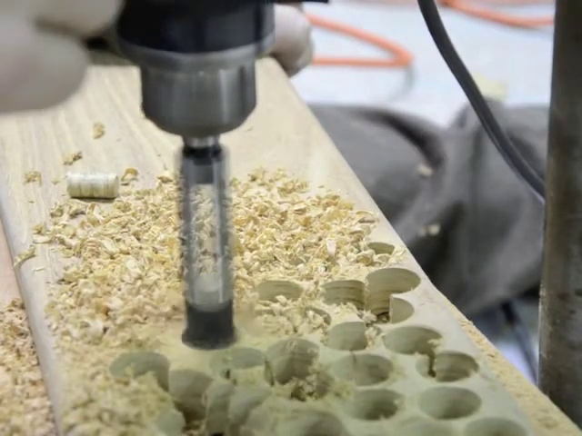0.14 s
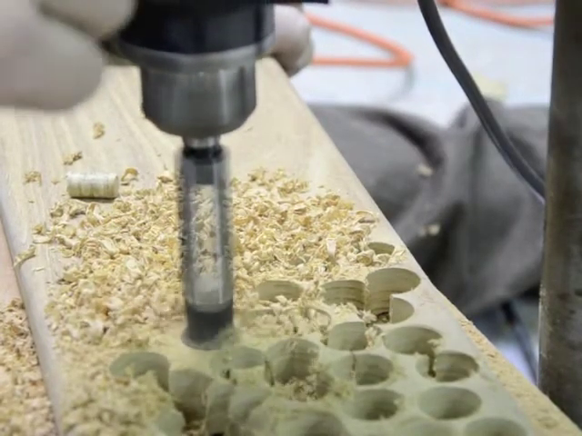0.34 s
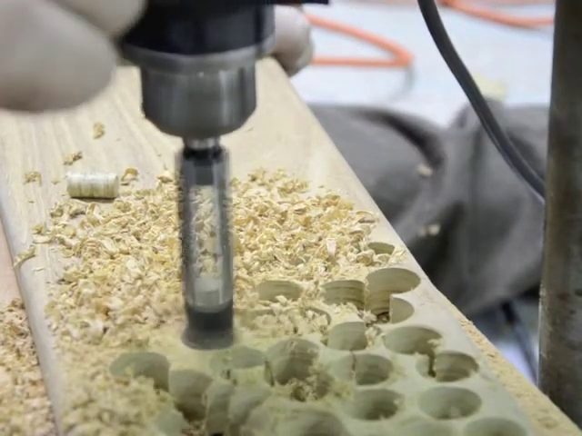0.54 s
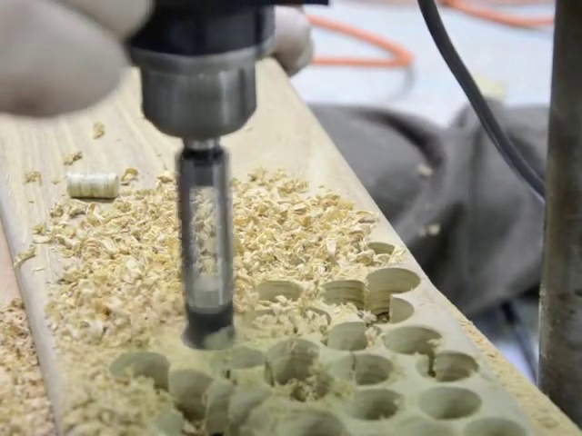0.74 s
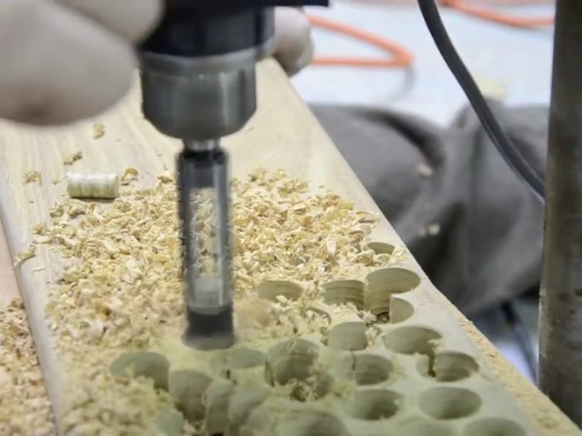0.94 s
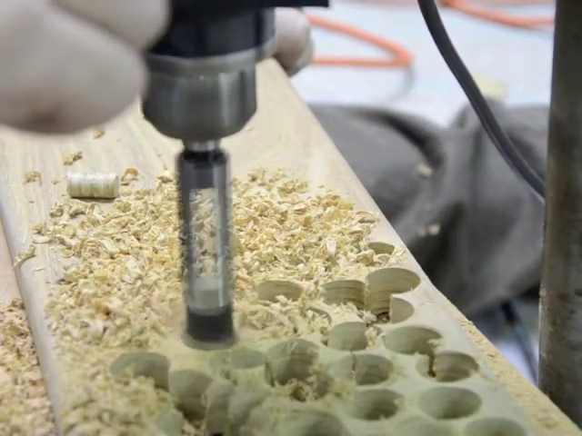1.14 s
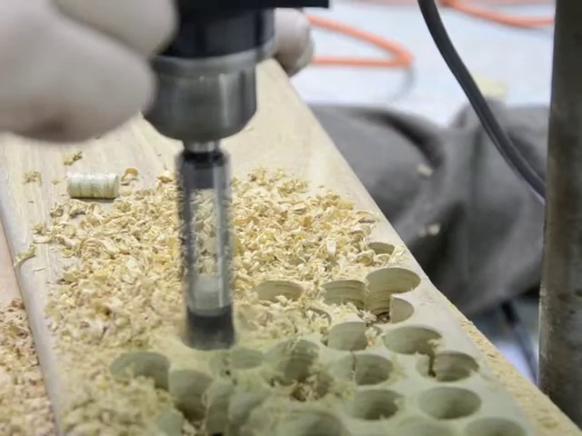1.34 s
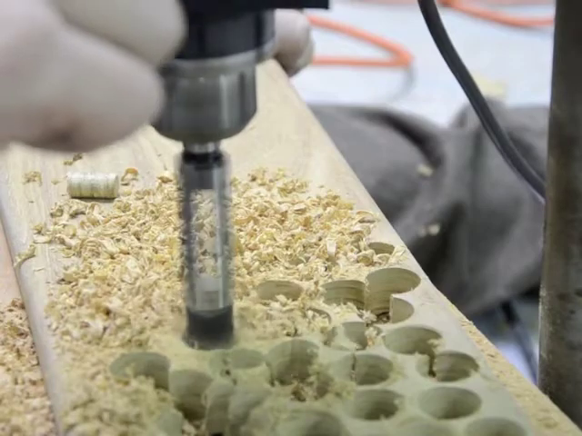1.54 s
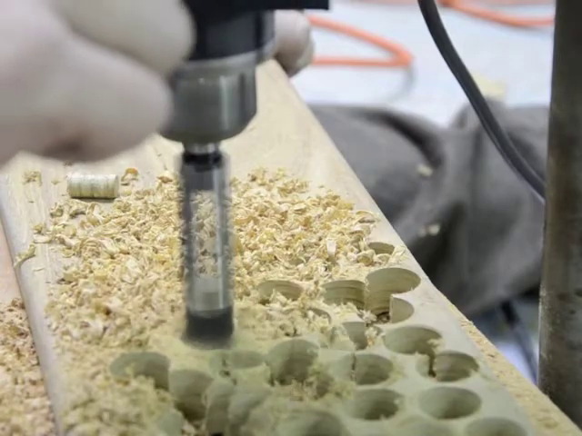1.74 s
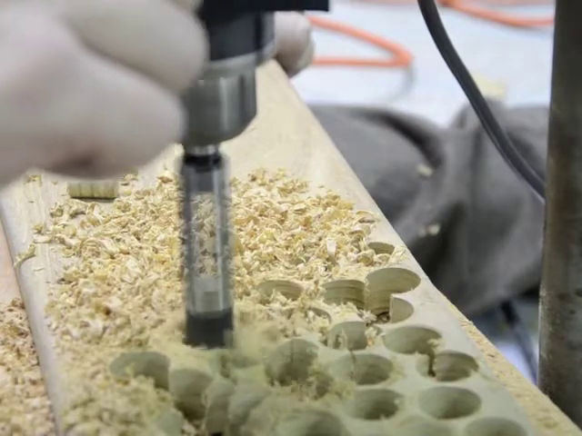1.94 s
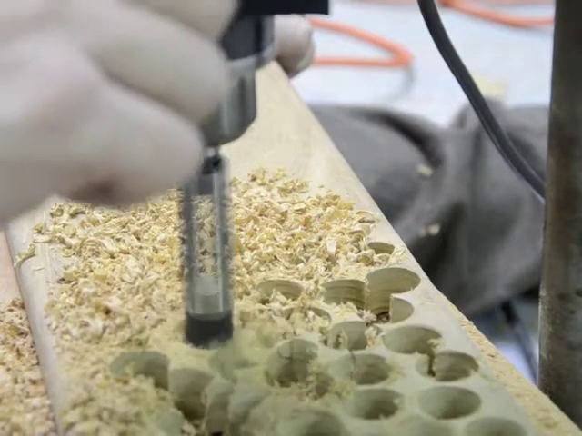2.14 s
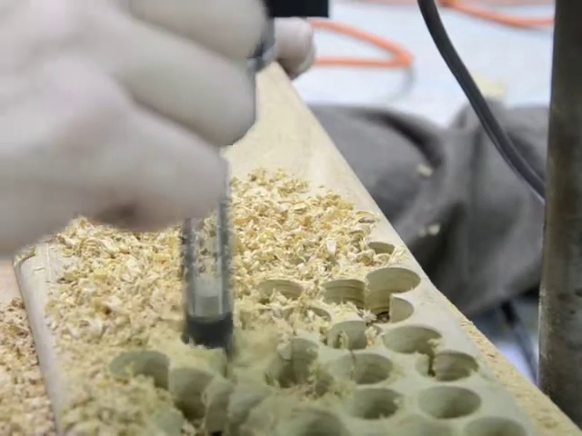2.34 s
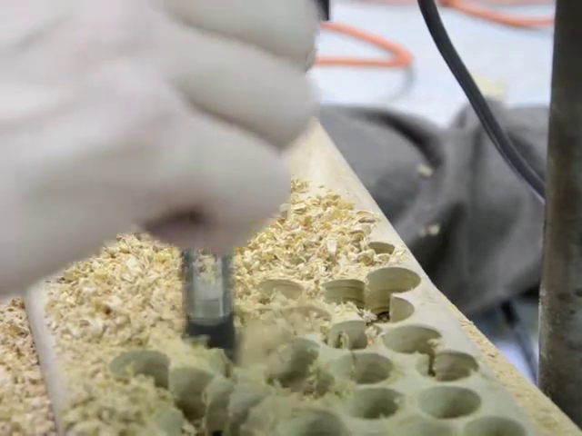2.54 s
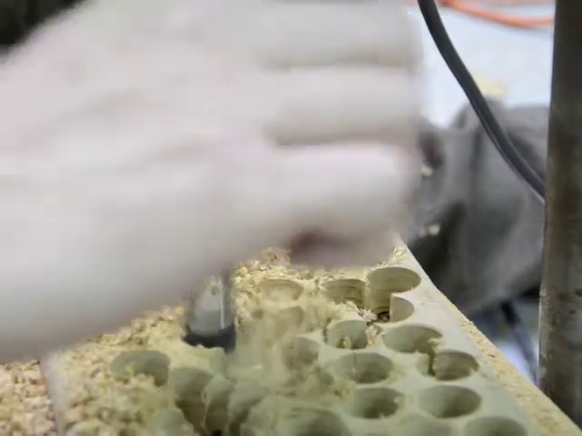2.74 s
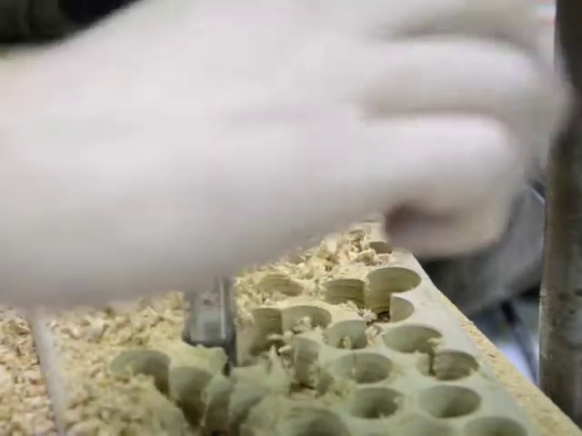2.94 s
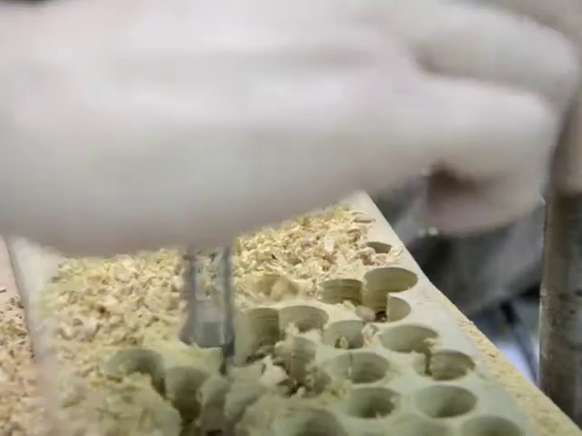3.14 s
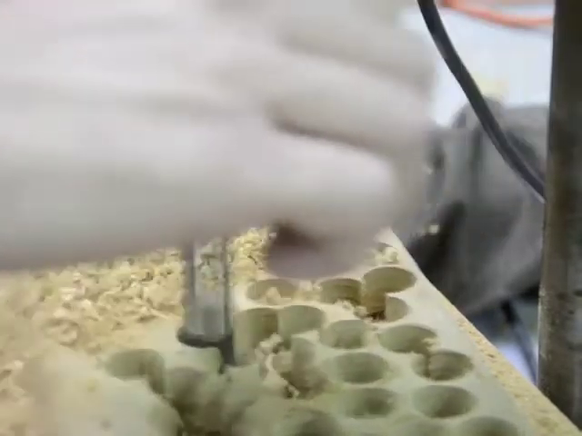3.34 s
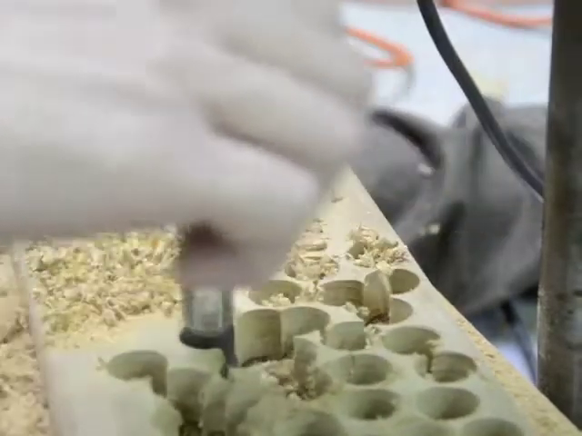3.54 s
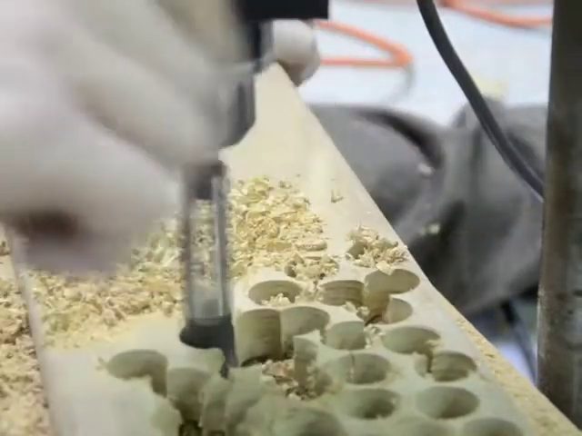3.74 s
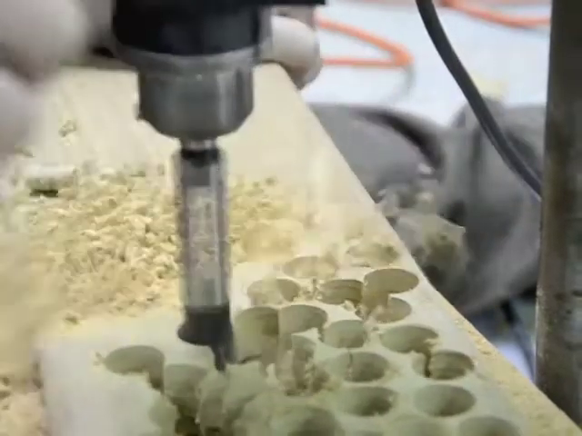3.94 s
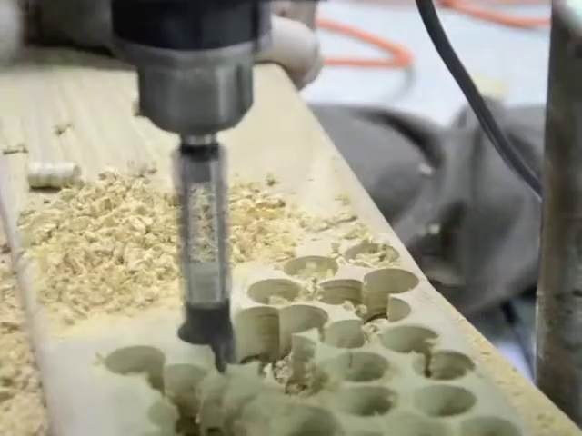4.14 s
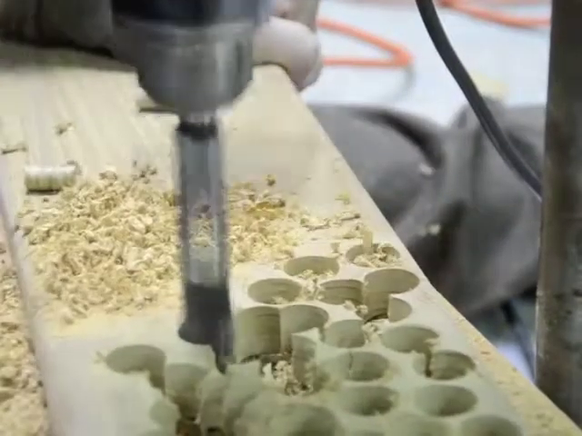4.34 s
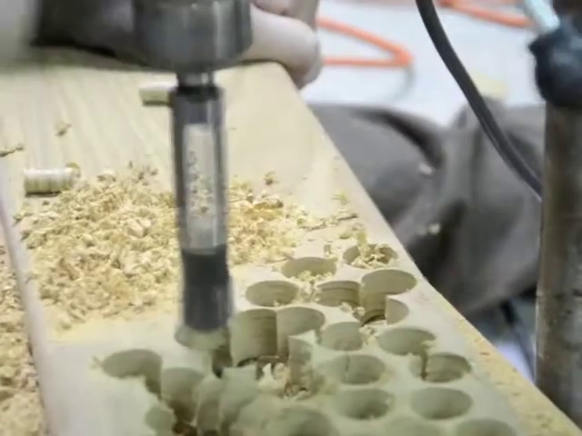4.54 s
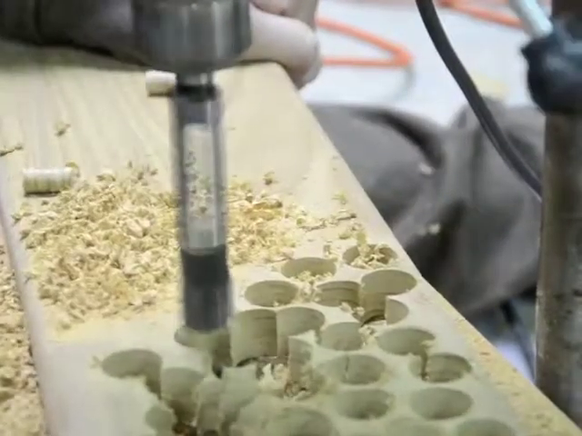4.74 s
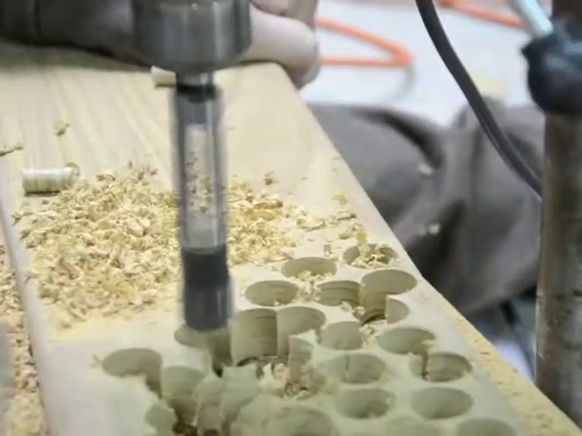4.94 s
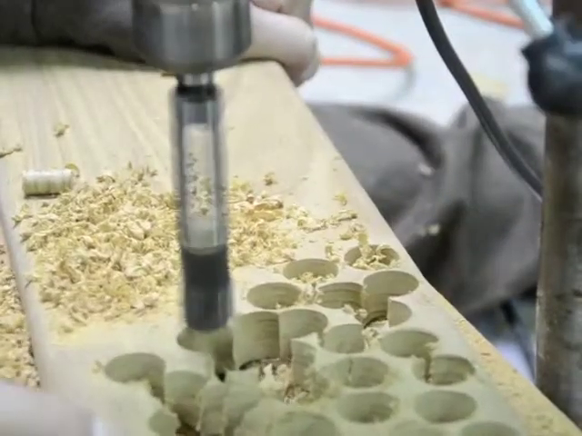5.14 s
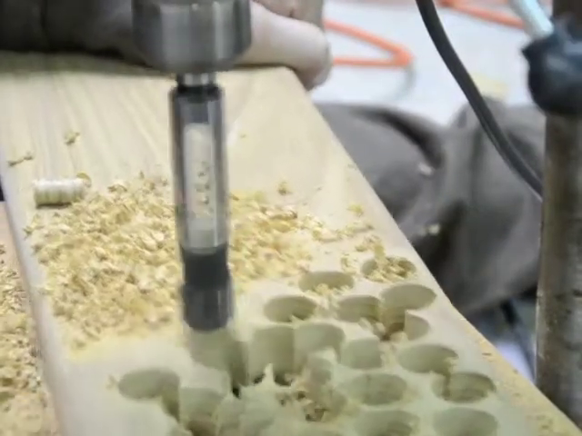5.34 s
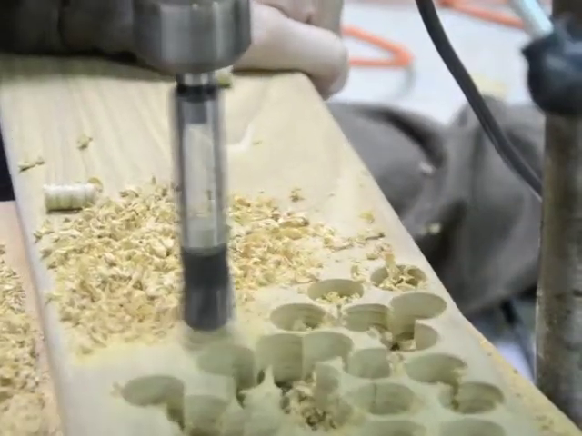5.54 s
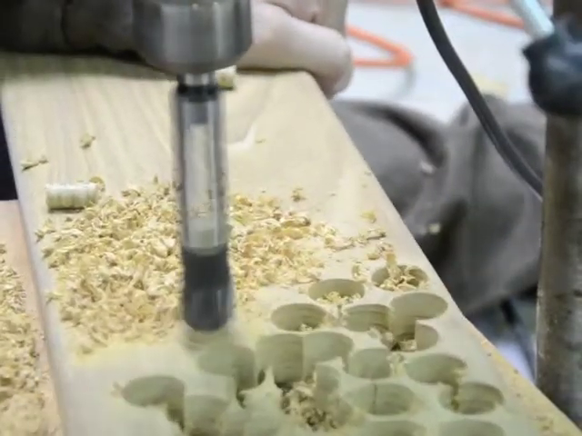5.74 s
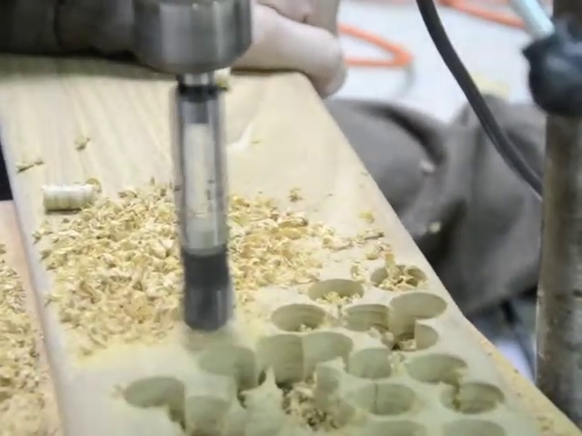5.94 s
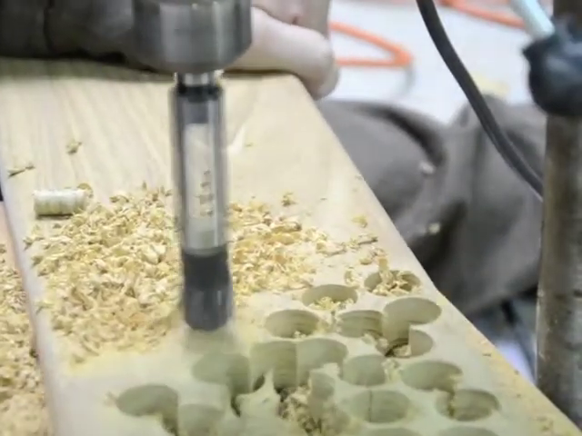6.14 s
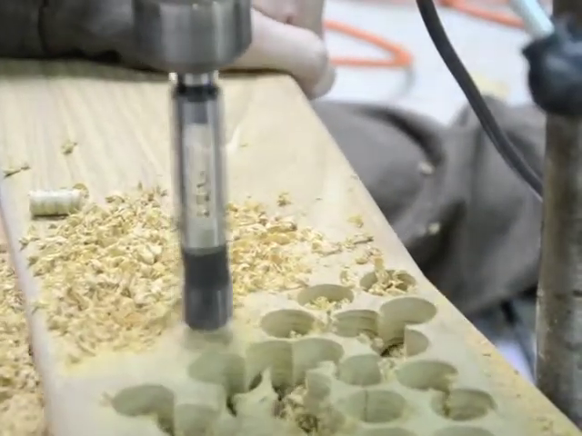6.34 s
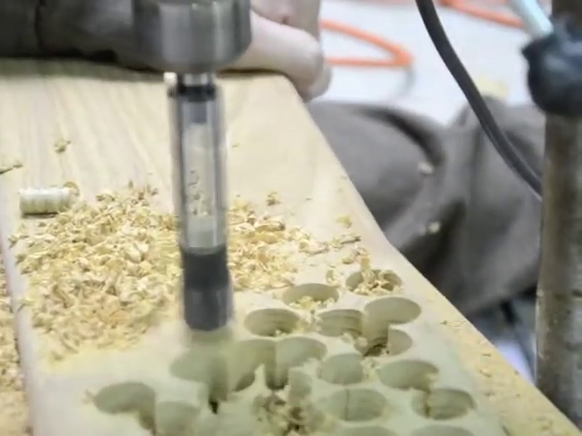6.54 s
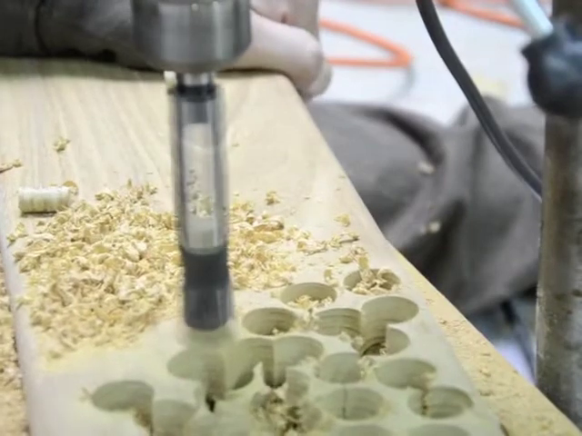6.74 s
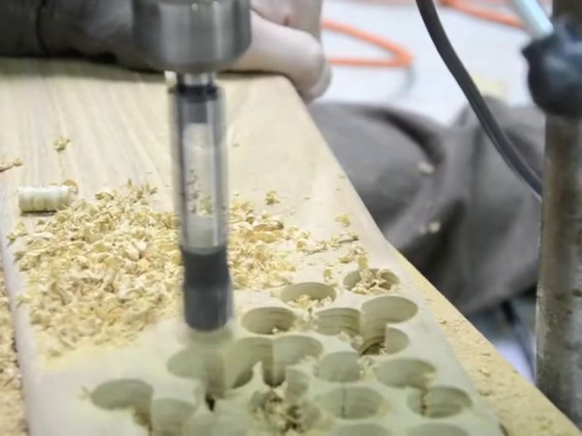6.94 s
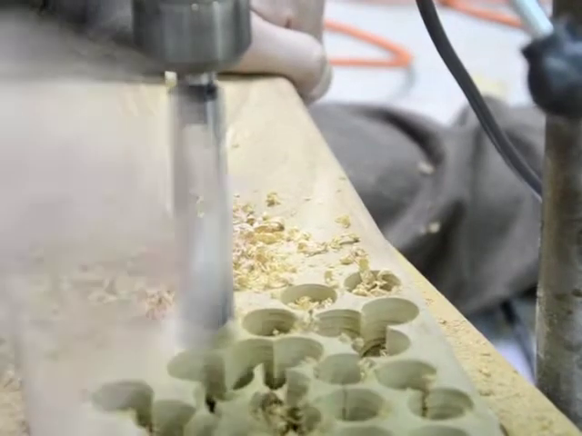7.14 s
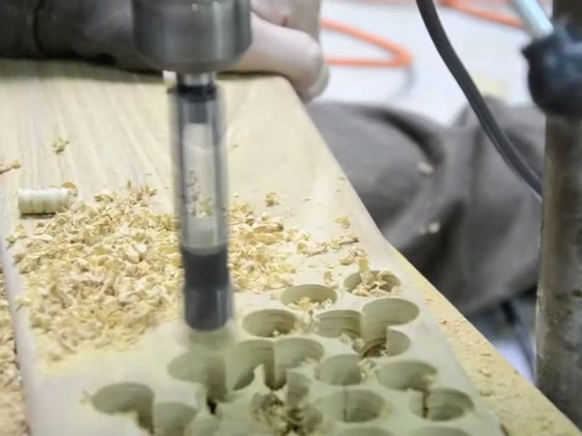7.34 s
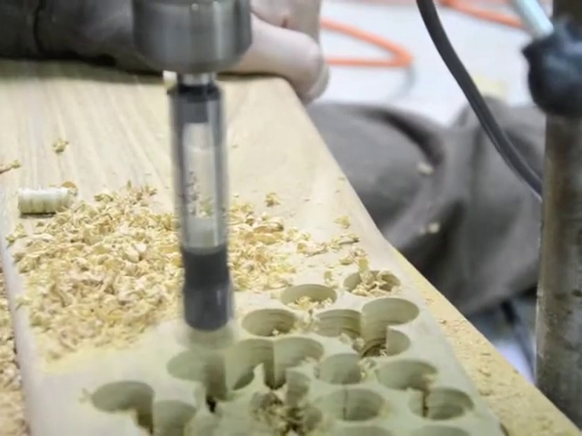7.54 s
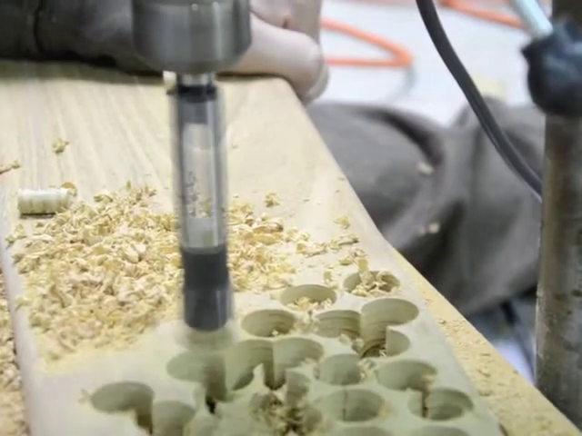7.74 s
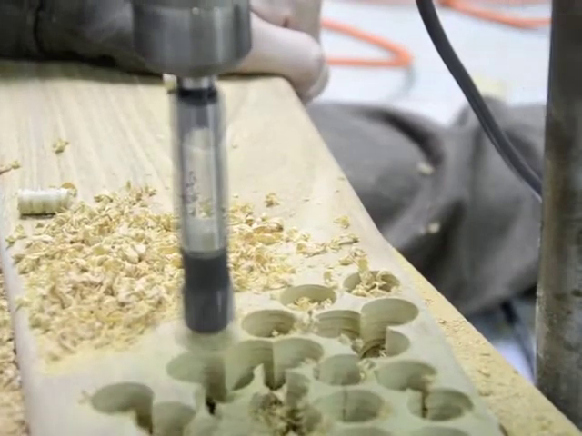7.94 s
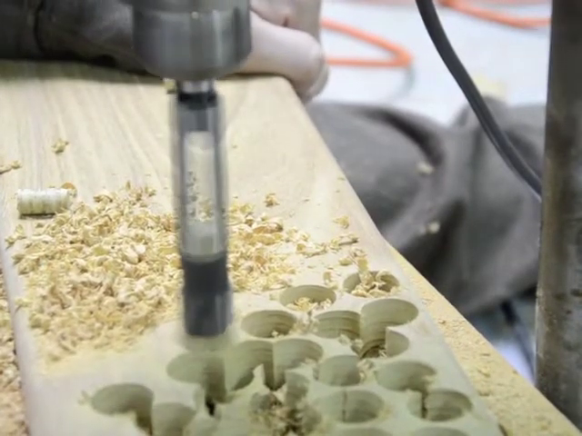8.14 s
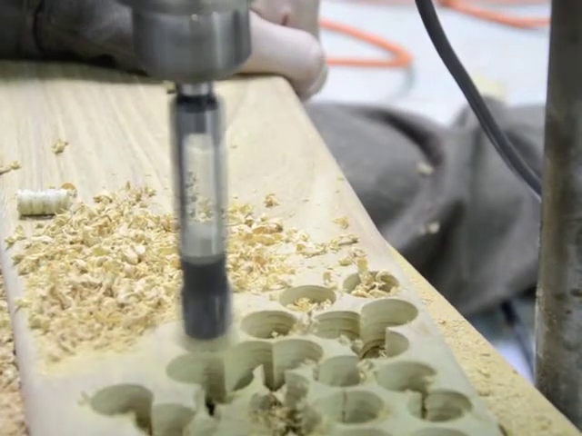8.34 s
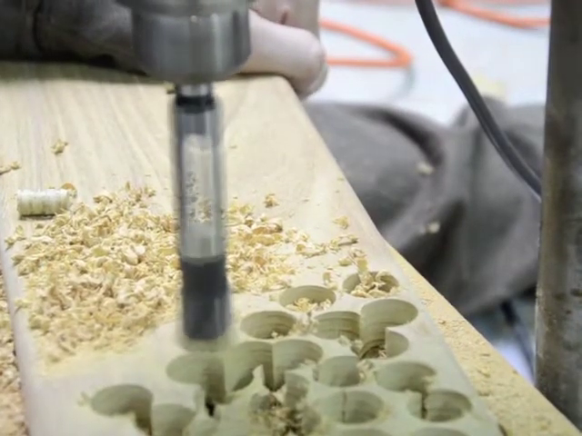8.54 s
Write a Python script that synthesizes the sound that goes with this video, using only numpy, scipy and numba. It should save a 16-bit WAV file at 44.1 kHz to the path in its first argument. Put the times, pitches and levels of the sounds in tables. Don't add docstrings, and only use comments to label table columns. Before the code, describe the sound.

Steady woody grinding over a motor hum, bursts of cracking and loud wooden chatter, then a free-spinning spindle clicking quickly in the reverberant workshop.

```python
import sys
import numpy as np
from scipy import signal
from scipy.fft import rfft, irfft
from scipy.io import wavfile
from scipy.ndimage import uniform_filter1d
from numba import njit

SR = 44100
rng = np.random.default_rng(int(sys.argv[2]) if len(sys.argv) > 2 else 0)


def log_audio(samples):
    frames = np.atleast_2d(samples).T
    limited = np.clip(frames, -1, 1)
    pcm = np.round(limited * 32767).astype(np.int16)
    wavfile.write(sys.argv[1], SR, pcm)


def attenuation_scalar(level_db):
    decades = np.asarray(level_db, float) / 20
    return 10 ** decades


N = 382788
T = np.arange(N) / SR
SPINDLE_LOADED_HZ, SPINDLE_FREE_HZ = 10.03, 10.64


def curves(table):
    s, *columns = np.transpose(table)
    return [np.interp(T, s, c) for c in columns]


def unit(x):
    return x / np.sqrt(np.mean(x ** 2))


def colour(x, points):
    hz, db = np.transpose(points)
    f = np.maximum(np.fft.rfftfreq(4096, 1 / SR), 1)
    gain = attenuation_scalar(np.interp(np.log(f), np.log(hz), db))
    cepstrum = irfft(np.log(gain))
    cepstrum[1:2048] *= 2
    cepstrum[2049:] = 0
    return signal.oaconvolve(x, irfft(np.exp(rfft(cepstrum))))[:N]


def ring(x, modes):
    out = 0
    for k, (hz, width, db) in enumerate(modes):
        b, a = signal.iirpeak(hz, hz / width, SR)
        out = out + (-1) ** k * attenuation_scalar(db) * signal.lfilter(b, a, x)
    return out


def band(x, lo_hz, hi_hz):
    sos = signal.butter(3, [lo_hz, hi_hz], "band", fs=SR, output="sos")
    return signal.sosfilt(sos, x)


@njit
def sweep(x, hz, width):
    y, b, l = np.empty(len(x)), 0., 0.
    for i in range(len(x)):
        g, k = np.tan(np.pi * hz[i] / SR), width / hz[i]
        v = (b + g * (x[i] - l)) / (1 + g * (g + k))
        b, l, y[i] = 2 * v - b, l + 2 * g * v, k * v
    return y


def walk(rate):
    k = int(SR / rate)
    steps = np.repeat(rng.standard_normal(N // k + 1), k)
    slewed = uniform_filter1d(uniform_filter1d(steps, k), k)
    return unit(slewed[:N])


def grit(spread_db):
    size_db = spread_db * np.minimum(rng.exponential(size=N), 6)
    return unit(rng.standard_normal(N) * attenuation_scalar(size_db))


def teeth(turns, once, twice, four):
    angle = 2 * np.pi * turns
    return attenuation_scalar(once * np.cos(angle) + twice * np.cos(2 * angle) + four * np.cos(4 * angle))


def layered(x):
    boom = band(band(x, 65, 412), 56, 610)
    return unit(band(x, 775, 2340)), unit(boom), unit(band(x, 3720, 20000))


def blows(times, db, decay_s, spray_db):
    kicks, spray = np.zeros(N), np.zeros(N)
    for s, gain, decay in np.broadcast(times, attenuation_scalar(db), np.maximum(decay_s, .001)):
        i = int(s * SR)
        kicks[i] += gain
        spray[i:i + 4000] += gain * np.exp(-T[:min(4000, N - i)] / decay)
    return kicks + attenuation_scalar(spray_db) * grit(1.0) * spray


def pings(table, gain_db, t60_s, rise_s):
    out, age = np.zeros(N + SR), T[:SR // 5]
    shape = (1 - np.exp(-age / rise_s)) * np.exp(-np.log(1000) * age / t60_s)
    for (s, db, hz), (pair, phase) in zip(table, rng.random((len(table), 2))):
        angle = 2 * np.pi * hz * age
        partner = np.sin(angle * (1.04 + 0.105 * pair) + 2 * np.pi * phase)
        out[int(s * SR):][:len(age)] += attenuation_scalar(db + gain_db) * shape * (np.sin(angle) + 0.49 * partner)
    return out[:N] * attenuation_scalar(3.0 * walk(400))


# start_s, feed level_db, cutter_depth in the hole [0-1]
BORING = [
    (0, -34, 0.23),
    (.95, -31, 0.18),
    (1.4, -31, 0.12),
    (1.75, -29.5, 0.69),
    (1.97, -33, 0.98),
    (2.1, -36.5, 0.65),
    (2.25, -40.5, 0.85),
    (2.5, -30.5, 0.72),
]
# freq_hz, level_db [per Hz]
SHEAR_COLOUR = [(360, -43.5), (650, -11.5), (750, -11), (1040, -2), (1180, -6.5), (1360, -1.5),
                (2050, -7.5), (2400, -10), (3100, -11), (4300, -21), (8300, -29.5), (8800, -35),
                (11500, -37), (16000, -44)]
# freq_hz, width_hz, level_db
CUTTER_MODES = [(2054, 74, 10.5), (5240, 160, 1), (6080, 190, -4), (7040, 140, -4), (8000, 230, -5),
                (9430, 640, -8), (11400, 650, -9), (13300, 400, -14)]


def bore(turns):
    level_db, depth = curves(BORING)
    shallow_hz, deep_hz = (1050, 1560, 1870), (715, 1340, 1740)
    sags = (depth ** 2, depth, depth)
    low_hz, high_hz, top_hz = (a + (b - a) * sag for a, b, sag in zip(shallow_hz, deep_hz, sags))
    shear = grit(1.1) * teeth(turns, 0.085, 1.6, 0.98) * attenuation_scalar(0.83 * walk(60.54))
    rub = grit(2.3) * teeth(turns, 1.8, 2.7, 2.0)
    wood = unit(colour(shear, SHEAR_COLOUR)) + attenuation_scalar(-15.5) * unit(ring(rub, CUTTER_MODES))
    low = attenuation_scalar(5.0 + 4.3 * depth) * sweep(shear, low_hz, 60.0)
    high = attenuation_scalar(9.5) * sweep(shear, high_hz, 45.0)
    top = attenuation_scalar(-3.5) * sweep(shear, top_hz, 73.0)
    hole = unit(low - high + top)
    middle, boom, bright = layered(wood)
    bright_db = -18.5 - 1 * (level_db + 31.5)
    hole_db = -6 + 7 * depth
    cut = middle + attenuation_scalar(-14.5) * boom + attenuation_scalar(bright_db) * bright + attenuation_scalar(hole_db) * hole
    fade = np.clip((BORING[-1][0] + 0.22 - T) / 0.61, 0, 1)
    return attenuation_scalar(level_db) * fade * cut


# start_s, length_s, first_db, last_db, table_weight_db
SNATCHES = [(2.518, 0.092, -21, -28.5, -2.5), (2.645, 0.04, -24, -15.5, 1), (2.745, 0.023, -26, -23.5, 0.5),
            (2.83, 0.017, -19, -22, -2), (2.902, 0.064, -24, -23.5, 1), (3.024, 0.02, -7.5, -14.5, -5),
            (3.094, 0.075, -8, -11, -2.5), (3.188, 0.0065, -12, -11, -7.5), (3.232, 0.033, -13, -12.5, -1),
            (3.281, 0.15, -10, -13.5, -3), (3.395, 0.015, -16.5, -17.5, 7.5), (3.775, 0.021, -23, -20, -5),
            (3.795, 0.061, -11.5, -20, 0.5), (3.866, 0.037, -11, -18, -2), (3.902, 0.045, -11, -9.5, -0.5),
            (3.976, 0.13, -14.5, -13, -1.5), (4.132, 0.03, -13, -11.5, -2.5), (4.18, 0.015, -9, -24, -7),
            (4.273, 0.093, -15, -11, 0), (4.377, 0.076, -17.5, -10, -6), (4.495, 0.15, -16.5, -44, -6)]


def bites(release_db_per_s, weight_share):
    attack_s = 0.0051
    gain, age = np.zeros(N), T[:SR // 2]
    for s, length, first_db, last_db, weight_db in SNATCHES:
        held_db = np.interp(age, [0, length], [first_db, last_db])
        db = held_db - release_db_per_s * np.maximum(age - length, 0)
        span = gain[int(s * SR):][:len(age)]
        bite = attenuation_scalar(db + weight_share * weight_db) * np.minimum(age / attack_s, 1)
        np.maximum(span, bite, out=span)
    return gain


# freq_hz, level_db [per Hz]
TEAR_COLOUR = [(24, -53), (40, -39.5), (320, -21.5), (402, 0), (503, 0), (556, 5.5), (852, -3),
               (1370, -7.5), (2260, -14), (2980, -10), (4340, -25), (11600, -37.5), (16000, -50)]
# freq_hz, width_hz, level_db
BOARD_MODES = [(402, 38, -4.5), (458.2, 30.5, 6.5), (813, 120, 1.5), (1054, 155, 4), (1330, 190, 3.5),
               (1616, 240, 0.5), (2000, 235, -1), (3000, 770, -15), (8100, 150, -23.5), (11800, 810, -27)]


def snatch():
    tear = grit(3.34) * attenuation_scalar(2.53 * walk(120))
    wood = unit(colour(tear, TEAR_COLOUR)) + attenuation_scalar(-14.0) * unit(ring(tear, BOARD_MODES))
    shares_db, releases_db_per_s, weight_shares = (-8.0, -9.5, -22.5), (457, 214, 587), (0, 0.63, -1)
    out = np.zeros(N)
    for db, release, weight, part in zip(shares_db, releases_db_per_s, weight_shares, layered(wood)):
        out += attenuation_scalar(db + 0.28 * walk(97)) * bites(release, weight) * part
    return out


# start_s, crack_peak_db, wooden_body_db and fine_splinters_db [against crack]
SPLINTER_BLOWS = [(1.316, -46, 0, 3), (1.84, -28, 10, -17), (1.881, -17.5, 5.5, -15), (1.951, -28, 13, -30),
                  (2, -36, 3, -11), (2.04, -29, 4, -2), (2.056, -20, -3, -12), (2.0981, -16, 8.5, -1.5),
                  (2.1511, -29, -4, -11), (2.221, -46, 0, -1), (2.243, -48, -2, 4), (2.287, -42, 0, -2),
                  (2.299, -36, -2, -3), (2.342, -48, -3, -2), (2.383, -32, 11, -9), (2.431, -25, 2, -12),
                  (2.442, -37, 4, -2), (2.456, -31, -3, -6), (2.5043, -23, 0, -14), (2.522, -19, -4, -9),
                  (2.5364, -17, 0, -25), (2.5432, -23, 11, -10), (2.598, -32, 6, -22), (2.65, -30, 7, -11),
                  (2.658, -21, 13, -27), (2.67, -25, 17, -20), (2.699, -26, 3, -13), (2.724, -32, 0, -3),
                  (2.74, -18.5, 5, -7), (2.8133, -26, -1, -10), (2.839, -17.5, -3, -8),
                  (2.909, -22.5, 3, -11), (2.9308, -17, 3.5, -9), (2.955, -25, 9, -10),
                  (3.525, -32, 6, -33), (3.558, -35, 7, -27), (3.6728, -30.5, 2.5, -18),
                  (3.698, -32, 5, -6), (3.754, -32, -1, -24)]
# start_s, crack_peak_db, wooden_body_db [against crack]
HAMMER_BLOWS = [(3.0266, -9.5, 7), (3.098, -19.5, 15.5), (3.108, -7.5, 2.5), (3.131, -10, 0),
                (3.1556, -7.5, 6.5), (3.196, -13.5, 11.5), (3.2404, -15, 15), (3.291, -26, 19),
                (3.315, -19, 12), (3.344, -13.5, 11.5), (3.404, -9.5, 2.5), (3.777, -24, 7),
                (3.805, -15, 7.5), (3.825, -13.5, -2), (3.8507, -19, 12), (3.872, -3.5, 1),
                (3.897, -18, 15), (3.969, -9.5, 6.5), (4.04, -12.5, 10), (4.0669, -7.5, 1.5),
                (4.1343, -15, 13), (4.158, -11, 4), (4.183, -13, 7), (4.279, -35, 13), (4.308, -22, 10),
                (4.327, -16, 9), (4.351, -13, 9.5), (4.4405, -14, 6.5), (4.4643, -14, 12), (4.485, -9, -9)]
# freq_hz, width_hz, level_db
CRACK_MODES = [(2510, 530, -2), (3205, 70, -1), (3480, 310, -5), (4850, 910, -17.5)]
# freq_hz, width_hz, level_db
PLUG_MODES = [(3110, 70, 3), (3430, 110, -4)]
# start_s, peak_db
CHIP_KNOCKS = [
    (8.423, -17.5),
    (8.516, -26.5),
    (8.613, -32),
]
# start_s, peak_db, pitch_hz
WEB_CHATTER = [(2.677, -6.5, 1250), (2.745, -15, 896), (2.769, -17, 1045), (2.91, -11, 1000),
               (3.028, -4, 1027), (3.122, -2, 1410), (3.146, -2, 1003), (3.163, -9, 1366),
               (3.194, -7, 1280), (3.197, -5, 1580), (3.245, -5.5, 1340), (3.263, -12, 910),
               (3.293, -10, 1000), (3.329, -7, 1390), (3.348, -9, 1386), (3.364, -14, 1560),
               (3.415, -13.5, 900), (3.444, -19, 1380), (3.803, -9, 880), (3.827, -13, 844),
               (3.852, -8, 786), (3.872, -5, 1225), (3.911, -1.5, 853), (3.922, -0.5, 1340),
               (3.93, -8, 991), (3.945, -7.5, 840), (3.984, -8.5, 905), (4.022, -12, 838),
               (4.044, -11, 1214), (4.066, -5, 1384), (4.079, -9, 853), (4.117, -14, 925),
               (4.136, -11, 1020), (4.161, -7.5, 1410), (4.184, -12, 1033), (4.308, -5.5, 857),
               (4.331, -11, 1020), (4.345, -4, 1490), (4.354, -5.5, 1054), (4.369, -9, 1320),
               (4.42, -5, 970), (4.425, -9.5, 806), (4.448, -9, 1525), (4.466, -6, 1787),
               (4.487, -15, 1010), (4.547, -18.5, 1490)]
# start_s, peak_db, pitch_hz
TABLE_THUDS = [(3.043, -19.5, 440), (3.173, -21, 408), (3.305, -11, 456), (3.343, -12.5, 465),
               (3.411, -6.5, 440), (3.439, -23, 441), (3.879, -13, 398), (3.931, -16, 388),
               (3.979, -11.5, 402), (4.16, -13.5, 449), (4.286, -19, 418), (4.313, -17, 472),
               (4.338, -24, 401), (4.366, -12, 410), (4.394, -16, 437), (4.424, -14, 477),
               (4.444, -18, 476), (4.472, -11.5, 460), (8.431, -17, 464)]


def strikes():
    s, crack_db, body_db = np.transpose([row[:3] for row in SPLINTER_BLOWS] + HAMMER_BLOWS)
    fine_db = np.array([row[-1] for row in SPLINTER_BLOWS] + [-13] * len(HAMMER_BLOWS))
    decay_s = np.repeat([0.004, 0.0088], [len(SPLINTER_BLOWS), len(HAMMER_BLOWS)])
    crack = ring(blows(s, crack_db, decay_s, -15.5), CRACK_MODES)
    fine_colour = [(3500, -21), (5500, 5), (8000, 3.5), (11500, -1.5), (14500, -10), (16000, -14)]
    fine = colour(blows(s, crack_db + fine_db, 0.79 * decay_s, -13.5), fine_colour)
    body = ring(blows(s, crack_db + body_db, 1.23 * decay_s, -20), BOARD_MODES)
    loose = (s > 2.52) & (s < 3.7)
    plug = ring(blows(s[loose], crack_db[loose], 0.0097, -13), PLUG_MODES)
    knock_s, knock_db = np.transpose(CHIP_KNOCKS)
    knock_modes = [(980, 104, 8.0), (1560, 200, -0.5), (1920, 190, -2.5), (3460, 2300, -26.5)]
    knock = ring(blows(knock_s, knock_db, 0.0054, -17.0), knock_modes)
    webs = pings(WEB_CHATTER, gain_db=-2.5, t60_s=0.043, rise_s=0.0013)
    thuds = pings(TABLE_THUDS, gain_db=-3.5, t60_s=0.13, rise_s=0.0033)
    wood = attenuation_scalar(17.0) * crack + attenuation_scalar(7.0) * fine + attenuation_scalar(20.5) * body
    return webs + thuds + attenuation_scalar(16.5) * plug + wood + attenuation_scalar(30.0) * knock


# start_s, peak_db, tick_db [against knock]
HARD_KNOCKS = [(4.92, -25.5, -26), (5.017, -23, -24), (5.1126, -24, -34), (5.204, -21.5, -28),
               (5.3703, -23, -28), (5.4634, -24, -27), (5.675, -24.5, -33), (5.7442, -23, -19),
               (5.8615, -20.5, -22), (5.932, -20.5, -23), (6.051, -21.5, -26), (6.1237, -21, -32),
               (6.2368, -20.5, -22), (6.334, -25, -41), (6.401, -20.5, -26), (6.5882, -23, -23),
               (6.872, -20, -22.5), (7.179, -23.5, -38), (7.2457, -20, -30), (7.2733, -32, -30),
               (7.389, -24, -28), (7.503, -26, -27), (7.623, -22, -26), (7.7396, -25, -29),
               (7.808, -23.5, -27), (7.8813, -18, -37), (7.9538, -18, -34), (8.008, -26.5, -18),
               (8.331, -22.5, -36), (8.5176, -20, -38)]
# freq_hz, width_hz, level_db
SLEEVE_MODES = [(920, 180, -8), (1393, 64, 4), (1436, 128, 1), (1623, 240, -5.5), (2024, 145, -11),
                (2800, 530, -20.5)]
# freq_hz, width_hz, level_db
TICK_MODES = [(4630, 230, -4), (5080, 260, 4), (6200, 250, -1), (6940, 400, -5), (8100, 490, 0.5),
              (9950, 1050, -4), (13100, 250, -19)]
# start_s, peak_db, pitch_hz
SOFT_REBOUNDS = [(4.714, -33, 1500), (4.7386, -30, 1390), (4.8714, -31, 1420), (5.0195, -25, 1390),
                 (5.1841, -33, 1460), (5.2071, -23, 1370), (5.2749, -37, 1240), (5.3552, -29, 1250),
                 (5.4919, -29, 1330), (5.5603, -32, 1390), (5.5837, -31, 1490), (5.675, -29, 1620),
                 (5.8227, -38, 1250), (5.8611, -28, 1374), (5.9623, -31, 1510), (6.1439, -29, 1344),
                 (6.2093, -34, 1390), (6.2387, -22.5, 1490), (6.2854, -32, 1460), (6.3051, -31, 1360),
                 (6.4317, -33, 1505), (6.6154, -30, 1395), (6.6862, -29, 1330), (6.7111, -35, 1260),
                 (6.776, -31, 1370), (6.8044, -30, 1400), (6.8992, -34, 1260), (7.0219, -35, 1250),
                 (7.155, -30, 1366), (7.2459, -25, 1350), (7.273, -24, 1370), (7.317, -37, 1386),
                 (7.3654, -26, 1370), (7.3914, -33, 1270), (7.5587, -27, 1400), (7.7423, -27, 1400),
                 (7.8306, -25, 1364), (7.9279, -23, 1330), (7.98, -34, 1540), (8.5424, -31, 1450)]


def rattle():
    hard_s, hard_db, hard_tick_db = np.transpose(HARD_KNOCKS)
    turn_s = np.arange(4.6395, T[-1] - .1, 1 / SPINDLE_FREE_HZ)
    light_s = np.concatenate([turn_s, turn_s + .75 / SPINDLE_FREE_HZ])
    jitter, force, brightness = rng.standard_normal((len(light_s), 3)).T
    s = np.concatenate([hard_s, light_s + 0.0032 * jitter])
    knock_db = np.concatenate([hard_db, -32 + 7 * np.minimum(force, 1)])
    tick_db = np.concatenate([hard_tick_db, -23 + 3 * np.minimum(brightness, 1)])
    force_db = knock_db + 0.48 * (knock_db + 25.0)
    knock = ring(blows(s, force_db, 0.014, -11.5), SLEEVE_MODES)
    tick = ring(blows(s, force_db + tick_db, 0.0042, -10.5), TICK_MODES)
    rebounds = pings(SOFT_REBOUNDS, gain_db=-2.5, t60_s=0.066, rise_s=0.0017)
    return attenuation_scalar(19.5) * knock + attenuation_scalar(13.5) * tick + rebounds


# start_s, peak_db, pitch_hz, length_s
CUTTER_SQUEAKS = [(1.63, -39, 8100, 0.0096), (1.725, -31.5, 8210, 0.01), (1.748, -47, 8300, 0.012),
                  (1.822, -35, 8170, 0.0093), (1.8454, -48, 8240, 0.012), (2.096, -23, 8020, 0.0043),
                  (2.19, -48, 7930, 0.012), (3.298, -38, 8100, 0.012), (4.34, -38, 8230, 0.0093),
                  (4.363, -32, 8260, 0.0081), (4.457, -64, 8190, 0.012)]


def squeaks():
    out = np.zeros(N)
    age = T[:int(.06 * SR)]
    for s, db, hz, length in CUTTER_SQUEAKS:
        shape = np.minimum(age / 0.0023, 1) * np.exp(-(age / max(length, .003)) ** 3)
        i = int(s * SR)
        out[i:i + len(age)] += attenuation_scalar(db) * shape * np.sin(2 * np.pi * hz * age * (1 + 0.24 * age))
    return out * attenuation_scalar(2.3 * walk(530))


# centre_s, length_s, level_db
BOARD_NUDGES = [
    (7.4, 0.18, -63),
    (7.934, 0.087, -46.5),
    (8.1, 0.15, -62),
    (8.37, 0.22, -55),
]


def slide():
    push = sum(attenuation_scalar(db) * np.exp(-((T - s) / length) ** 2) for s, length, db in BOARD_NUDGES)
    drag_modes = [(2490, 520, 1), (3680, 530, 0), (4700, 500, -13), (12500, 4000, -19.0)]
    drag = ring(grit(4.9) * attenuation_scalar(7.6 * walk(90)), drag_modes)
    return push * unit(drag)


def flutter(turns):
    from_s, to_s, fade_s = 4.55, 8.35, .06
    spinning = np.clip(np.minimum(T - from_s, to_s - T) / fade_s, 0, 1)
    puffs = grit(4.5) * teeth(turns, 0.74, 6, 3.5) * attenuation_scalar(4 * walk(70) + 0.72 * walk(1.74))
    dust_db = 2 * np.exp(-np.abs(T - from_s) / 0.47)
    return attenuation_scalar(-71.5 + dust_db) * spinning * unit(band(puffs, 10800, 15000))


# time_s, load_share [0-1]
MOTOR_LOAD = [(0, 1), (1.5, .95), (2.0, .7), (2.5, 0), (3.05, 0), (3.3, .8), (3.6, 0), (3.8, 0), (4.0, .8),
              (4.5, .7), (4.7, 0)]
CASING_TONE_HZ = [200, 242.5, 400, 442.5, 475.2, 600]
# level_db [rms], wobble_db, load_change_db
CASING_TONES = [(-51.5, 0.5, -4), (-66.5, 6, -23), (-44.5, -1, -7), (-39.5, 3.5, -8), (-39.5, 3.5, 2),
                (-48.5, -0.4, -3.5)]
SLOT_TONES = [-49, -45, -45.5, -51]
# freq_hz, level_db [per Hz]
MACHINE_COLOUR = [(30, -44), (110, -32.5), (230, -35), (358, -30), (376, -17), (420, -15.5), (465, -9.5),
                  (520, -16), (575, -21), (900, -18), (1120, -25.5), (1380, -27), (3000, -38.5),
                  (4100, -51), (13000, -70), (16000, -71)]
# freq_hz, width_hz, level_db
WHINE_MODES = [(5120, 120, -7), (6720, 140, 2.5), (9300, 200, -3), (13050, 130, -5)]


def motor(turns):
    mains_hz, hum_hz, slot_free_hz, slot_loaded_hz = 50.0, 500.0, 1044.9, 1030.6
    load, = curves(MOTOR_LOAD)
    noise_db = -35 - 1.5 * load + 1.53 * walk(1.38)
    hum_db = -31 + 5 * load + 0.61 * walk(7.0)
    out = np.sqrt(2) * attenuation_scalar(hum_db) * np.sin(2 * np.pi * hum_hz * T)
    for hz, (db, wobble_db, load_db) in zip(CASING_TONE_HZ, CASING_TONES):
        tone_db = db + load_db * load + wobble_db * walk(12)
        out += np.sqrt(2) * attenuation_scalar(tone_db) * np.sin(2 * np.pi * (hz * T + rng.random()))
    slot_turns = np.cumsum(slot_free_hz + (slot_loaded_hz - slot_free_hz) * load) / SR
    for k, db in enumerate(SLOT_TONES):
        tone_turns = slot_turns + (k - 1) * 2 * mains_hz * T
        out += np.sqrt(2) * attenuation_scalar(db - 9 * load) * np.sin(2 * np.pi * tone_turns)
    noise = unit(colour(grit(0.43) * teeth(turns, 0.48, 0.12, 1.2), MACHINE_COLOUR))
    whine = np.zeros(N)
    for mode in WHINE_MODES:
        whine += attenuation_scalar(4.9 * walk(1.6)) * ring(grit(1.5) * attenuation_scalar(2.5 * walk(8)), [mode])
    bearing = unit(ring(grit(2.3) * teeth(turns, 8.4, 2.2, 7.5), TICK_MODES))
    machine = noise + attenuation_scalar(-43.0) * bearing + attenuation_scalar(-38.5) * unit(whine)
    return out + attenuation_scalar(noise_db + 1.0 * walk(7.0)) * machine


def shop(x):
    t60_s, level_db = 0.66, -11
    age = T[:int(.7 * SR)]
    noise = rng.standard_normal(len(age))
    dull = signal.lfilter([.2], [1, -.8], noise)
    tail = dull * np.exp(-np.log(1000) * age / t60_s)
    tail += 0.17 * noise * np.exp(-np.log(1000) * age / (0.34 * t60_s))
    tail *= age > .006
    return attenuation_scalar(level_db) * signal.fftconvolve(x, tail / np.sqrt(np.sum(tail ** 2)))[:N]


def scene():
    boring_turns = SPINDLE_LOADED_HZ * (T - .222)
    free_turns = SPINDLE_FREE_HZ * (T - 5.0)
    cutting = bore(boring_turns) + snatch() + strikes() + squeaks()
    work = cutting + rattle() + slide() + flutter(free_turns)
    return (work + shop(work) + motor(free_turns - .2))[None]


def band_limit(x):
    return signal.sosfilt(signal.butter(12, 16530, fs=SR, output="sos"), x)


def record(dry):
    hiss = attenuation_scalar(-85) * rng.standard_normal(dry.shape)
    rounded = np.tanh(.9 * dry) / .9
    top_cut = signal.ellip(8, .2, 40, 15650, fs=SR, output="sos")
    cut = signal.sosfilt(top_cut, rounded + hiss)
    fade = np.minimum((T[-1] - T) / .004, 1)
    return band_limit(cut * fade)


dry = scene()
out = record(dry)
log_audio(out)
```